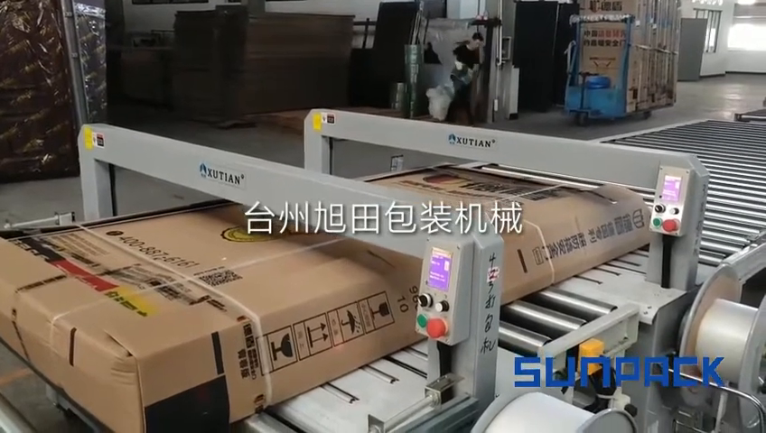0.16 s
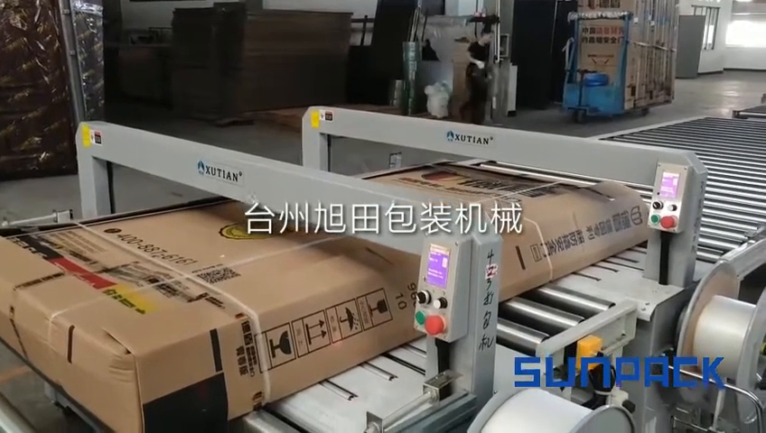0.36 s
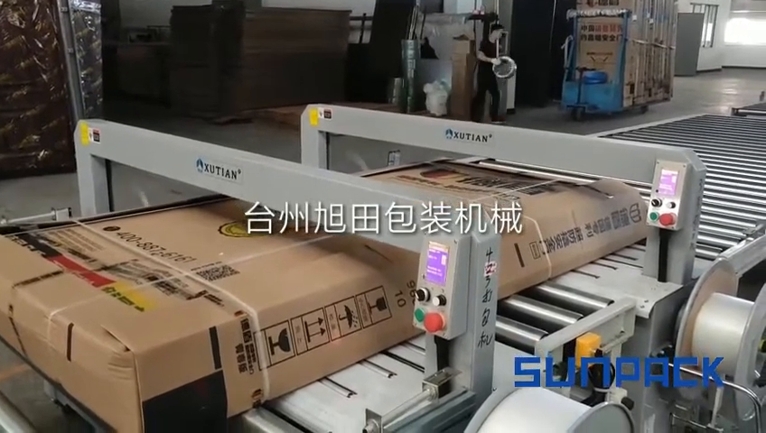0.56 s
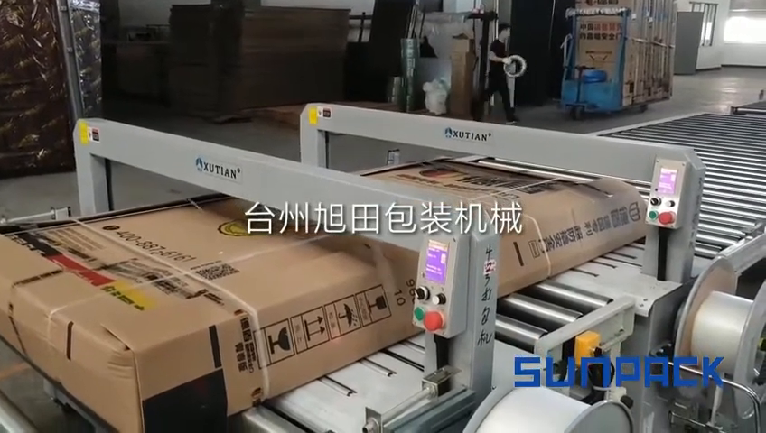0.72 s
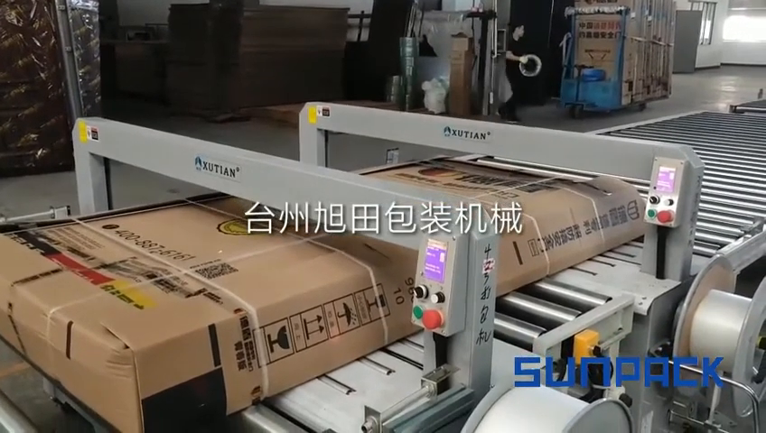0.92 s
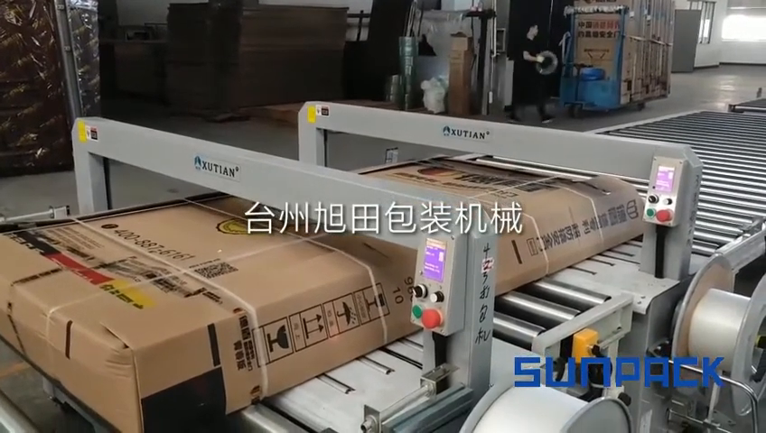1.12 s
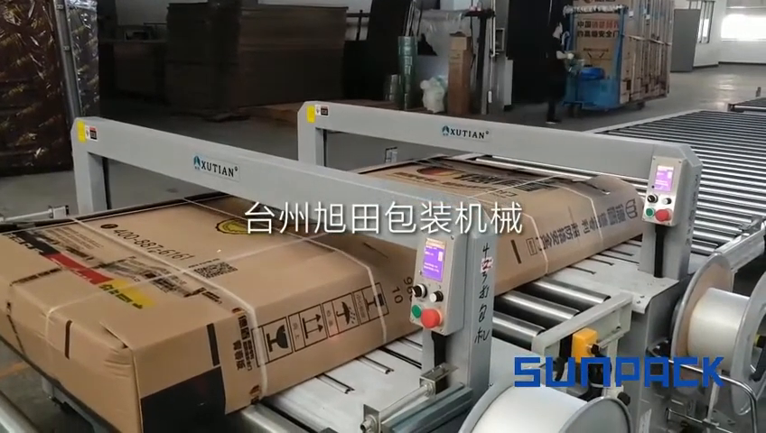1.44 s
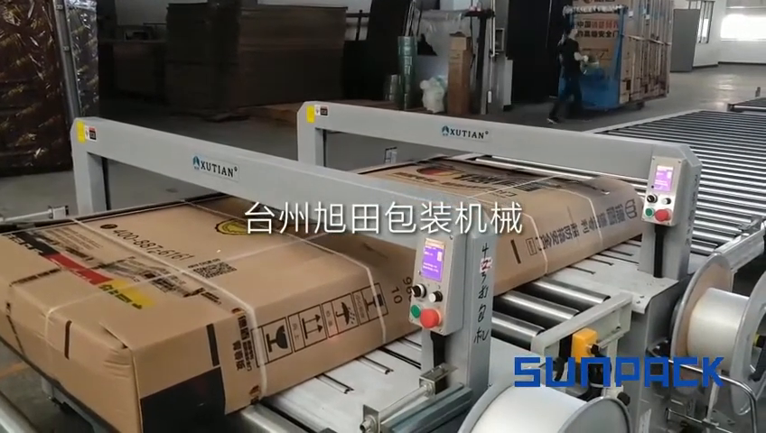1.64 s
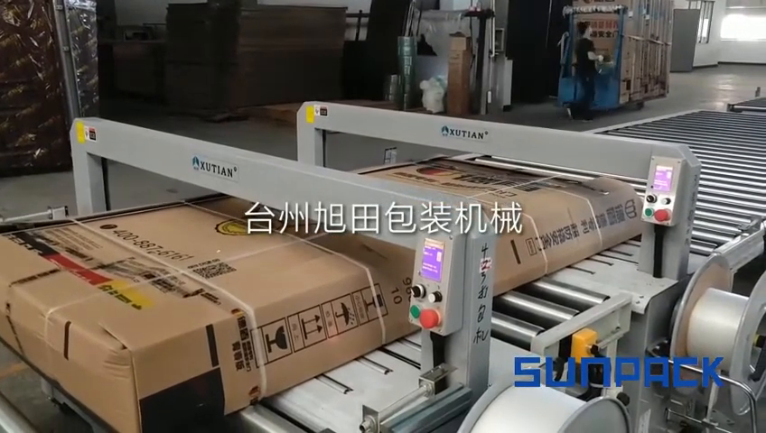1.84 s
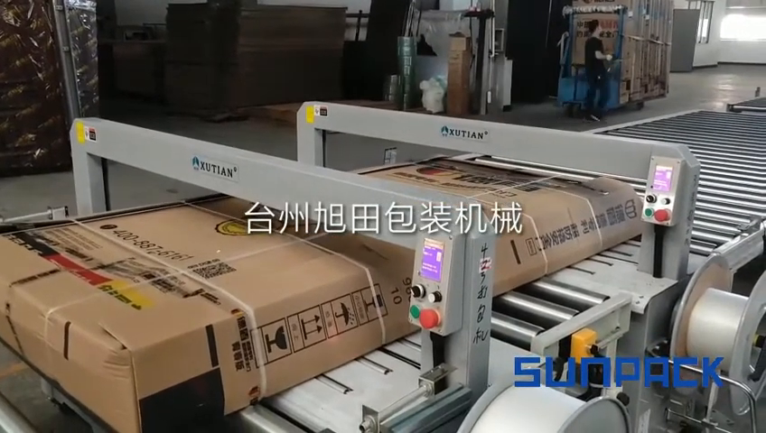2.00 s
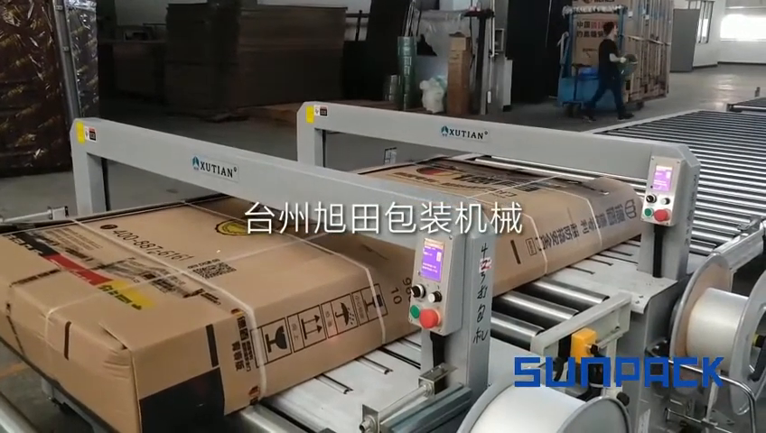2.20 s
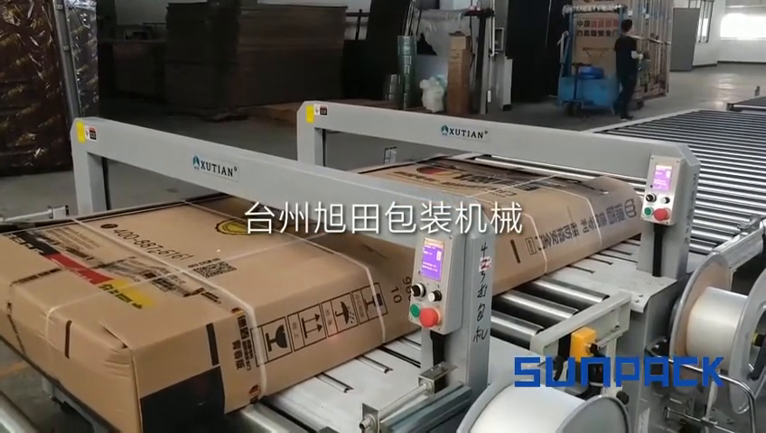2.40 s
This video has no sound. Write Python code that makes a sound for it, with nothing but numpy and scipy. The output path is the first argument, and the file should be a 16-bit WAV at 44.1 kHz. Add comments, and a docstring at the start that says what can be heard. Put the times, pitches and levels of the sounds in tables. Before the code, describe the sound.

Strapping machine in a humming factory hall: a scraping rasp, strap zipping back with metallic clacks, a low carton groan, then a dense clatter and new strap rushing through, heard from a few metres in stereo.

```python
"""A factory hall hums; then a scraping rasp opens the work of two strapping machines on a long carton.
Strap is pulled back through its steel chute (grainy noise and chute resonances) among metallic blows.
The carton groans under the tightening strap (stick-slip jerks into resonances), the sealing head clatters
(struck modes and bright ticks), and new strap is shot round the chute. More rasps come as grippers and flaps
let go. A diffuse tail puts the machines in the hall, a few metres from a phone with two microphone ports."""
import sys
import numpy as np
from scipy import signal
from scipy.fft import rfft, irfft
from scipy.io import wavfile
from scipy.ndimage import uniform_filter1d

SR = 44100
rng = np.random.default_rng(int(sys.argv[2]) if len(sys.argv) > 2 else 0)


def boost(x):
    """Linear amplitude factor 10**(x/20) for a level x in decibels (scalar or array-like)."""
    u = np.asarray(x, float) / 20
    return 10 ** u


def persist_wave(psi):
    """Save psi, clipped to +-1, as 16-bit WAV."""
    counts = np.round(np.clip(psi, -1, 1) * 32767).astype(np.int16)
    wavfile.write(sys.argv[1], SR, np.atleast_2d(counts).T)


N = 112896  # length in samples


def unit(x):
    """Scale to rms 1, over all channels together."""
    return x / np.sqrt(np.mean(x ** 2))


def colour(x, table, share=1):
    """Equalise by (freq_hz, gain_db) points on a log frequency axis; share scales the dB."""
    hz, db = np.array(table, float).T
    f = np.maximum(np.fft.rfftfreq(N, 1 / SR), 1)
    gain_db = np.interp(np.log(f), np.log(np.maximum(hz, 1)), db)
    return irfft(rfft(x) * boost(share * gain_db), N)


def white_pair():
    """Two unrelated white noises: sum and difference of the ports."""
    return rng.standard_normal((2, N))


def noise(table):
    """Two unrelated noises of one colour, rms 1."""
    return unit(colour(white_pair(), table))


def walk(rate_hz):
    """Random levels, new ones at rate_hz with linear slides between them; rms 1."""
    hold = max(int(SR / rate_hz), 1)
    steps = rng.standard_normal(N)[np.arange(N) // hold]
    return unit(uniform_filter1d(steps, hold))


def curve(table):
    """Gain along (time_s, level_db) points, -120 dB outside them."""
    s, db = np.array(table, float).T
    return boost(np.interp(np.arange(N) / SR, s, db, -120, -120))


def butter(x, hz, kind="low"):
    """Second-order Butterworth filter."""
    return signal.sosfilt(signal.butter(2, hz, kind, fs=SR, output="sos"), x)


def ring(x, hz, width_hz):
    """Two-pole resonance, gain 1 at the centre."""
    return signal.lfilter(*signal.iirpeak(hz, hz / width_hz, SR), x)


def modes(x, table):
    """A struck body: sum of decaying modes of alternating sign."""
    out = np.zeros_like(x)
    for k, (hz, db, t60_s) in enumerate(table):
        width_hz = np.log(1000) / np.pi / t60_s  # bandwidth that decays 60 dB in t60_s
        out += (-1) ** k * boost(db) * ring(x, hz, width_hz)
    return out


def decays(times_s, dbs, holds_s, t60s, attack_s):
    """Power-summed envelopes: linear attack, hold counted from the start, exponential release."""
    t = np.arange(N) / SR - np.asarray(times_s)[:, None]
    released = np.maximum(t - np.asarray(holds_s)[:, None], 0)
    fall = boost(-60 * released / np.maximum(t60s, .004)[:, None])
    envelopes = boost(dbs)[:, None] * np.clip(t / attack_s, 0, 1) * fall
    return np.sqrt((envelopes ** 2).sum(0))


# chute resonances rung by the moving strap: freq_hz, width_hz (before widening), pull_db, feed_db
CHUTE_RINGS = [(1850, 420, -10, -24), (2400, 350, -12, -14), (3950, 400, -17, -18), (6700, 950, -12, -26)]


def strap(level, tone, column, flutter_db):
    """Strap edge rubs the chute: dense uneven grains with a flutter; each chute resonance flickers alone."""
    grains = white_pair() * boost(1.5 * walk(900) + flutter_db * walk(44.38))
    rubbing = unit(colour(grains, tone))
    for row in CHUTE_RINGS:
        hz, width_hz = row[0], row[1]
        chute = unit(ring(ring(grains, hz, 1.14 * width_hz), hz, 1.15 * width_hz))
        rubbing = rubbing + boost(row[column] + 2.0 * walk(60)) * chute
    return unit(rubbing) * curve(level)


# strap pulled back, loudness over time: time_s, level_db
PULL_LEVEL = [(.425, -38), (.437, -23), (.5, -23), (.545, -22.5), (.56, -20.5), (.59, -19), (.611, -20),
              (.617, -27), (.64, -20.5), (.68, -25.5), (.72, -32.5), (.76, -31), (.82, -45), (.95, -55)]
# tone of the pulled strap: freq_hz, gain_db (per Hz)
PULL_TONE = [(240, -15), (400, -8.5), (501, -15), (532, -12), (566, -7.5), (720, -16.5), (1080, -17.5),
             (1910, -3.5), (2060, -9), (3550, -4), (3830, -10), (4380, -8.5), (6680, -7.5), (12000, -21.5),
             (14600, -34)]


def strap_pull():
    """Friction of the strap drawn back through its chute."""
    return strap(PULL_LEVEL, PULL_TONE, column=2, flutter_db=-0.45)


# new strap shot round, loudness over time: time_s, level_db
FEED_LEVEL = [(1.74, -35), (1.775, -34), (1.782, -27.5), (1.82, -28.5), (1.9, -30.5), (1.93, -33.5),
              (1.97, -25), (2.05, -27.5), (2.1, -24), (2.18, -25.5), (2.24, -31.5), (2.3, -45), (2.38, -55)]
# tone of the fed strap: freq_hz, gain_db (per Hz)
FEED_TONE = [(240, -39), (400, -30), (472, -10), (557, -14), (720, -17), (958, -9), (1030, -8.5),
             (1570, -11.5), (2330, 3.5), (2870, -0.5), (4060, -0.5), (6010, -5.5), (8890, -11),
             (13000, -32), (14600, -31)]


def strap_feed():
    """Friction of new strap running round the chute."""
    return strap(FEED_LEVEL, FEED_TONE, column=3, flutter_db=-0.14)


# blows: start_s, level_db, thud_db and treble_db (relative to level_db),
# t60_s (of the noisy chatter in frame and steel, scaled for each; the bright tick has a fixed short decay);
# every layer also has its own level offset
HEAD_BLOWS = [(0.5546, -14.5, -10, 5, .05), (0.587, -20, -13, -11, .05), (0.623, -9.5, -15, 8, 0.066),
              (0.6417, -3, -13, -10, 0.066), (0.6664, -12.5, -7, -14, .07), (1.4619, -15, -3.5, -14, .1),
              (1.4716, -15.5, -5, -12, .1), (1.4787, -11, -9, -13, 0.065), (1.4878, -6, -8.5, -8.5, 0.076),
              (1.503, -6, -5.5, -3, 0.1), (1.5379, -2, -7, -5, 0.053), (1.5464, -13, -5, -10, .05),
              (1.5637, -6, -9, -9, 0.027), (1.5797, -0.5, -14, -9.5, 0.046), (1.5985, -9, 2, -1, 0.062),
              (1.6361, -4.5, -5.5, -13, 0.032), (1.6422, -1, -9.5, -8.5, 0.068), (1.6773, -4, -5, -3, 0.03),
              (1.716, -11, -17, -0.5, 0.055), (1.7792, -17.5, -2, 0, 0.059), (1.8239, -10, -1, -7, 0.075),
              (2.4098, -22, -4, 12, 0.029)]
# low modes of the machine frame: freq_hz, level_db (relative), t60_s
FRAME_MODES = [(176, -5.5, 0.03), (302, 1.5, 0.075), (379.5, -3.5, 0.071), (532, -9, 0.019),
               (599, -3, 0.083), (720, -3, 0.037), (839, -4.5, 0.068), (983, -11, 0.017), (1278, -12, .03)]
# higher modes of the clacking steel: freq_hz, level_db (relative), t60_s
STEEL_MODES = [(1550, -3.5, 0.0063), (1980, 4, 0.019), (2345, 3.5, 0.01), (2675, -3.5, 0.0073),
               (3130, -4, 0.009), (3886, -5, 0.029), (4700, -11.5, 0.0061)]
# tone of the bright tick: freq_hz, gain_db (per Hz)
TICK_TONE = [(3000, -2), (4500, 11), (7000, 8.5), (9500, 1), (11000, -21), (13000, -24), (14500, -34)]


def blows():
    """Each blow puts a push and its chatter into frame and steel modes, and adds a bright tick."""
    s, db, thud_db, treble_db, t60_s = np.array(HEAD_BLOWS, float).T
    white, no_hold, at = white_pair(), 0 * s, (s * SR).astype(int)

    # single-sample impulses of random sign
    push, snap = np.zeros((2, 2, N))
    push[:, at] = boost(db + thud_db + 38.5) * np.sign(white[::-1, at])
    snap[:, at] = boost(db + 18.5) * np.sign(white[:, at])

    # noisy chatter after each impulse
    frame_chatter = white * decays(s, db + thud_db + 13.5, no_hold, 0.93 * t60_s, 0.0022)
    steel_chatter = white * decays(s, db + 2, no_hold, 0.58 * t60_s, 0.00032)

    thud = modes(push + frame_chatter, FRAME_MODES)
    clack = modes(snap + steel_chatter, STEEL_MODES)
    tick = noise(TICK_TONE) * decays(s, db + treble_db - 9, no_hold, no_hold + .022, 1e-4)
    return butter(thud + clack + tick, 9100)


# rasps as grippers and flaps let go: start_s, level_db (before layer offsets), thud_db (relative),
# thud_hz, ring_db (relative), ring_hz, t60_s (of the rasp; shortened for the two rings)
RELEASE_BURSTS = [(0.346, -15.5, -12, 255, -4, 4700, 0.49), (.645, -16.5, -7, 302, -23.5, 3000, 0.17),
                  (1.662, -15.5, -10, 686, -5.5, 5070, 0.19), (1.677, -9, -9, 720, -13.5, 8500, 0.15),
                  (1.82, -12.5, -6, 300, -19, 6000, 0.12), (1.847, -17.5, -31, 303, 5.5, 1950, 0.27),
                  (2.431, -9.5, -12, 387, -7, 2600, 0.23), (2.546, -20.5, -12, 246, -3, 5730, .15)]
# tone of the rasp: freq_hz, gain_db (per Hz)
RASP_TONE = [(530, -17), (900, -6.5), (1290, -11), (1650, -8), (2400, 0), (3400, -9.5), (4100, -5.5),
             (5060, -8.5), (6850, -7), (9380, -11), (10300, -25), (11600, -17.5), (14600, -31)]


def bursts():
    """Scraping noise with a held start and a slower fade, each burst with its own low and bright ring."""
    hold_s, bright_q = 0.021, 6.7
    s, db, thud_db, thud_hz, ring_db, ring_hz, t60_s = np.array(RELEASE_BURSTS, float).T
    holds = hold_s + 0 * s
    roughness, white = boost(1.4 * walk(300)), white_pair()
    out = noise(RASP_TONE) * decays(s, db - 10.5, holds, t60_s, 0.0027)
    for k in range(len(s)):
        def fade(extra_db, share):
            """Envelope of this burst, its decay shortened by share."""
            return decays(s[[k]], db[[k]] + extra_db, holds[[k]], share * t60_s[[k]], 0.00045)

        low_width_hz = 1.03 * thud_hz[k]
        low = unit(ring(ring(white, thud_hz[k], low_width_hz), thud_hz[k], low_width_hz))
        bright = unit(ring(white, ring_hz[k], ring_hz[k] / bright_q))
        out = out + low * fade(thud_db[k] - 4.5, 0.43) + bright * fade(ring_db[k] - 9, 0.22)
    return roughness * out


# carton groaning, loudness over time: time_s, level_db
GROAN_LEVEL = [(1.04, -57), (1.064, -37), (1.072, -31), (1.17, -27.5), (1.25, -28), (1.27, -32.5),
               (1.39, -31), (1.44, -39), (1.47, -29), (1.7, -33.5), (1.76, -36), (1.85, -31.5), (1.95, -49),
               (2.0, -47)]
# carton resonances: freq_hz, width_hz (before widening), level_db (relative)
CARTON_RINGS = [(165, 36, -9), (225, 26, 0), (290, 40, -6)]


def groan():
    """Stick-slip jerks of the tightening strap, nearly regular, ring the carton."""
    slips_per_s, scatter_db, hiss = 44, 1.8, .018
    slip_count = np.cumsum(slips_per_s * (1 + 0.088 * walk(30)) / SR)
    slips = np.diff(np.floor(slip_count), prepend=0)  # one impulse per slip
    jerks = slips * boost(scatter_db * white_pair()) + hiss * white_pair()
    body = np.zeros((2, N))
    for k, (hz, width_hz, db) in enumerate(CARTON_RINGS):
        wide_hz = 1.3 * width_hz
        body += (-1) ** k * boost(db) * ring(ring(jerks, hz, wide_hz), hz, wide_hz)
    return unit(body) * curve(GROAN_LEVEL)


def room(x):
    """Diffuse tail of the hall: decaying noise with a soft onset, the treble dying sooner."""
    level_db, low_t60_s, treble_t60_s, onset_s = -10.5, 0.88, 0.37, 0.059
    t = np.arange(SR) / SR
    tail = rng.standard_normal((2, SR)) * np.clip(t / onset_s, 0, 1)
    low = butter(tail, 3500)
    tail = low * boost(-60 * t / low_t60_s) + (tail - low) * boost(-60 * t / treble_t60_s)
    tail = tail / np.sqrt((tail ** 2).sum(1, keepdims=True))
    return boost(level_db) * signal.fftconvolve(x, tail, axes=1)[:, :N]


# tone of the hall background: freq_hz, gain_db (per Hz)
HALL_TONE = [(15, -40), (25, 0), (71, 3), (117, -2.5), (228, 0.5), (565, -5.5), (700, -1.5), (990, -4),
             (2030, -6.5), (2450, -3), (3460, -13.5), (3750, -14.5), (4770, -13), (5600, -20.5),
             (7110, -20), (9040, -28.5), (14600, -48.5)]
# swell of the hall's bass: time_s, level_db (relative)
HALL_BASS_SWELL = [(0, 4), (.12, 1.5), (.35, 0), (.55, 0.5), (.78, 0), (.85, -6), (1.04, 1), (1.2, 4),
                   (2.0, 2), (2.2, -2.5), (2.38, -0.5), (2.48, 3.5), (2.56, 4.5)]
# swell of the hall's treble: time_s, level_db (relative)
HALL_TREBLE_SWELL = [(0, -3.5), (.08, 5), (.33, 5), (.9, 2), (1.05, -2.5), (1.2, 2), (1.44, -1), (2.3, 5.5),
                     (2.56, 2)]


def hall():
    """Distant machines as coloured noise: bass and treble swell apart, the middle wavers at random."""
    bed = noise(HALL_TONE)
    bass, treble = butter(bed, 900), butter(bed, 3000, "high")
    middle = (bed - bass - treble) * boost(1.2 * walk(12.2))
    return boost(-32.5) * (bass * curve(HALL_BASS_SWELL) + middle + treble * curve(HALL_TREBLE_SWELL))


# port difference relative to port sum: freq_hz, gain_db
SIDE_TONE = [(60, -24.5), (110, -17), (200, -19), (370, -12), (680, -7), (1250, 0), (2290, -0.5), (4200, 0),
             (7720, -0.5), (14200, 0)]
# left port relative to right, scaled by a share at each port: freq_hz, gain_db
LEFT_TONE = [(60, 0.24), (110, -0.11), (200, -0.012), (370, -0.021), (680, -0.048), (1250, 0.76),
             (2290, -2.1), (4200, 0.96), (7720, -0.84), (14200, 0.27)]


def ports(mid, side):
    """Two microphone ports from sum and difference, each with its own tone."""
    side = colour(side, SIDE_TONE)
    left = colour(mid + side, LEFT_TONE, share=0.17)
    right = colour(mid - side, LEFT_TONE, share=-1.18)
    return np.array([left, right])


def scene():
    """Machines with their room tail, carton and hall, spread over the two ports."""
    near = strap_pull() + strap_feed() + blows() + bursts()
    mid, side = near + room(near) + groan() + hall()
    return ports(mid, side)


def roll_off(x):
    """The treble ends steeply here."""
    return signal.sosfilt(signal.butter(12, 14760, fs=SR, output="sos"), x)


def record(dry):
    """The phone rounds the loudest peaks by soft saturation."""
    rounded = np.tanh(.7 * dry) / .7
    return roll_off(rounded)


dry = scene()
out = record(dry)
persist_wave(out)
```